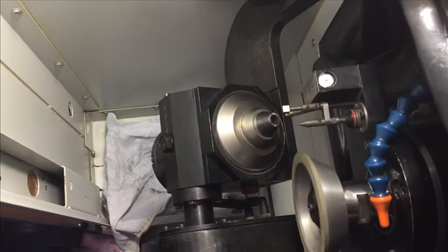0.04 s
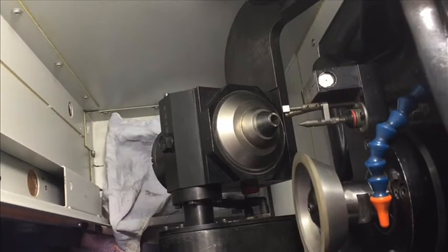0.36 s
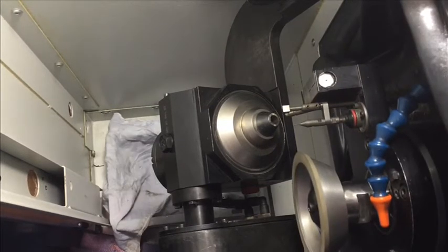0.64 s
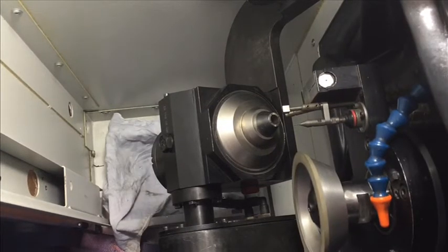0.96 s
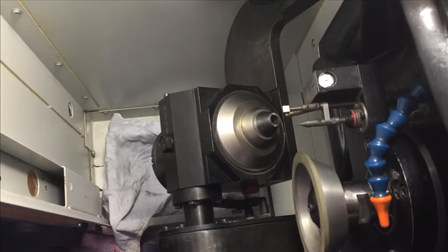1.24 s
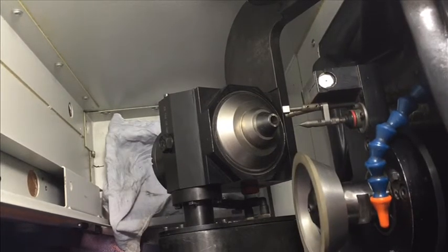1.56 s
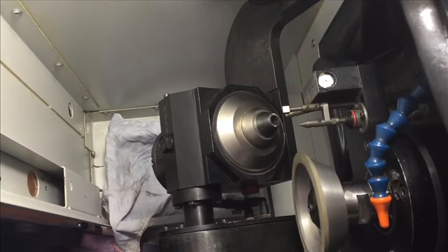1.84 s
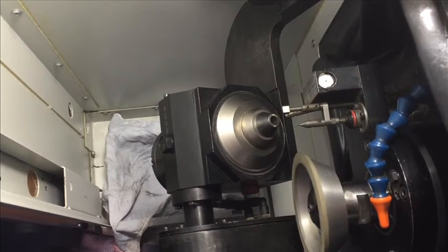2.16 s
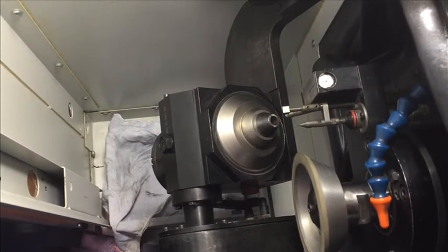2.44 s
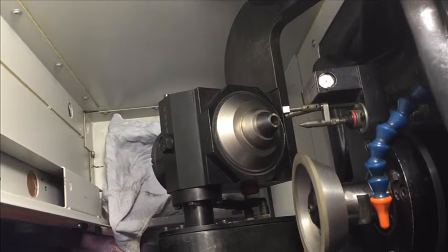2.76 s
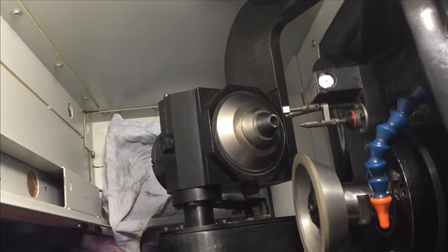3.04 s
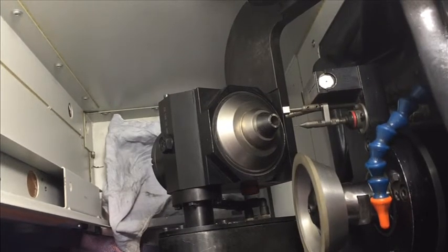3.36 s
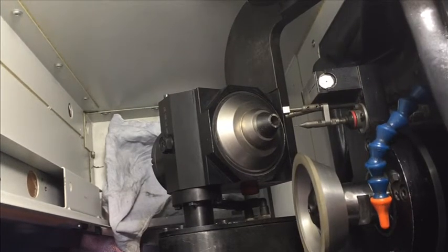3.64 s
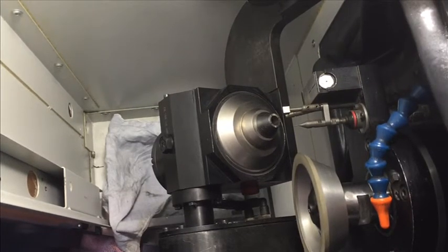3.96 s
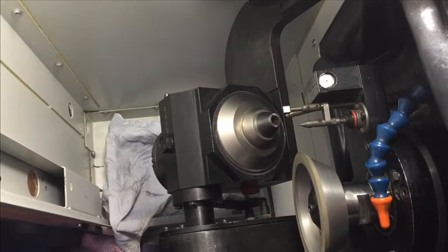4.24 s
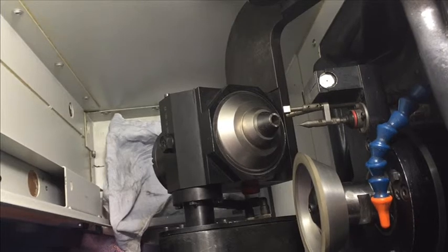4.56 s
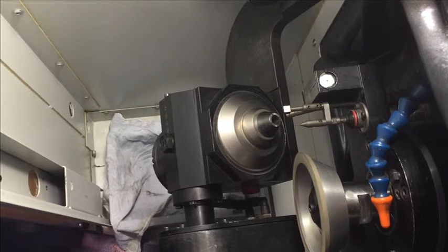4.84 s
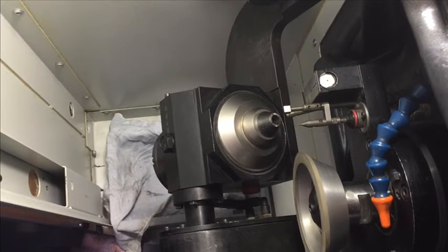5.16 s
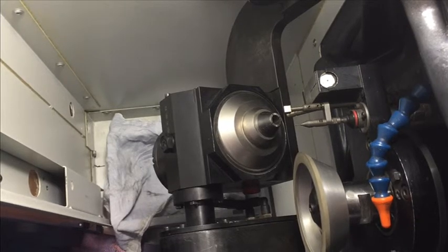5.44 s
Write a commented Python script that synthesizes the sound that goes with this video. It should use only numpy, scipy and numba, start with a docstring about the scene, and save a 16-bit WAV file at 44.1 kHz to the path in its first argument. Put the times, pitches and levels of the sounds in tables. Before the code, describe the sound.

A valve clacks and air hisses loudly in a grinding machine, stops briefly over a low hum, then blasts again.

```python
"""Compressed air in a tool grinder

Air blows inside the steel cabin of an idle grinder: two long blasts, with a valve clack at the start
and one between them. The hiss gets brighter and fuller as the jet sweeps over metal parts, and a few
bumps make the panels ring. Underneath, the machine hums and a motor drive whines; an automatic
volume control turns everything down while the air is on."""
import sys
import numpy as np
from scipy import signal
from scipy.fft import rfft, irfft, next_fast_len
from scipy.io import wavfile
from scipy.ndimage import uniform_filter1d, map_coordinates
from numba import njit

SR = 44100
rng = np.random.default_rng(int(sys.argv[2]) if len(sys.argv) > 2 else 0)


def int16_out(signal):
    """Quantize to a 16-bit WAV file."""
    q = np.round(np.clip(np.atleast_2d(signal).T, -1, 1) * 32767)
    wavfile.write(sys.argv[1], SR, q.astype(np.int16))


N = 246959
TOP_HZ = 15350  # upper limit of the treble


def amp(db):
    """Turn decibels into a number to multiply by."""
    return 10 ** (np.asarray(db) / 20)


def unit(x):
    """Scale a signal to an average (rms) level of 1."""
    return x / np.sqrt(np.mean(x ** 2) + 1e-20)


def along(points, hz):
    """Read a smooth path through (pitch, value) points at the pitches hz."""
    pitches, values = np.transpose(points)
    return np.interp(np.log(hz + 1), np.log(pitches + 1), values)


def wobble(rate):
    """A smooth curve through `rate` random values a second."""
    return map_coordinates(rng.standard_normal(int(N * rate / SR) + 4), [np.arange(N) * rate / SR])


def filtered(x, response):
    """Make each pitch in x louder or softer by the factor response(hz)."""
    size = next_fast_len(x.shape[-1] + SR // 4)
    return irfft(rfft(x, size) * response(np.fft.rfftfreq(size, 1 / SR)), size)[..., :x.shape[-1]]


def noise(response, length=N):
    """Noise of level 1, with its tone shaped by response(hz)."""
    return unit(filtered(rng.standard_normal(length), response))


def valve(open_s=0.013, empty_s=0.068):
    """Air flow from 0 to 1: the valve snaps open, and the hose empties after it shuts."""
    # When the valve is open: start_s, end_s
    blasts = [(-.05, 1.8216), (2.216, 5.233)]
    t = np.arange(N) / SR
    return sum(np.clip((t - start) / open_s, 0, 1) * amp(-60 * np.maximum(t - end, 0) / empty_s)
               for start, end in blasts)


def pressure_db(rise_s=0.009):
    """Extra hose pressure: it jumps up, settles, and stays a little high while stored air drains."""
    # Pressure surges: start_s, overshoot_db, settle_s, reserve_db, drain_s
    surges = [(.085, 8, 0.18, 2, 0.98), (2.205, 3.5, .09, 4.5, 0.34)]
    total = np.zeros(N)
    for start_s, overshoot_db, settle_s, reserve_db, drain_s in surges:
        age = np.maximum(np.arange(N) / SR - start_s, 0)
        overshoot = overshoot_db * np.cos(np.pi / 2 * np.minimum(age / settle_s, 1)) ** 2
        reserve = reserve_db * np.cos(np.pi / 2 * np.minimum(age / drain_s, 1))
        total += np.minimum(age / rise_s, 1) * (overshoot + reserve)
    return total


def sweep_db(edge_s=0.059, arch_share=0.18):
    """Splash and whistle rise as the jet meets a part, peak at its middle and drop at its far edge."""
    # Passes of the jet over a part: start_s, end_s, extra_splash_db, extra_whistle_db
    sweeps = [(-.05, 0.614, 2, 3), (0.668, 1.038, 4.5, 6.5), (1.196, 1.632, 1.7, 1),
              (1.672, 1.877, 4.5, 9.5), (2.308, 2.702, 4.6, 7.5), (2.81, 3.08, 1.3, 6),
              (3.136, 3.505, 4, 8.5), (3.62, 3.868, 2.2, 0), (3.945, 4.13, 5, 7), (4.195, 4.48, 2.5, -1),
              (4.554, 4.728, 5.2, 9), (4.853, 5.28, 2.5, 1)]
    t, splash, whistle = np.arange(N) / SR, np.zeros(N), np.zeros(N)
    for start, end, splash_db, whistle_db in sweeps:
        on_part = np.clip(np.minimum(t - start, end - t) / edge_s + .5, 0, 1)
        arch = np.sin(np.pi * np.clip((t - start) / (end - start), 0, 1))
        contact = on_part * (1 - arch_share + arch_share * arch)
        splash += splash_db * contact
        whistle += whistle_db * contact
    return splash, whistle


def jet_band(low_hz, high_hz):
    """One pitch range of the jet's noise, coloured by sound bouncing between the panels."""
    # The tone of the jet: pitch_hz, level_db
    jet = [(300, -24), (1050, -16.5), (1900, -9.5), (2450, -8.5), (3000, -17.5), (4300, -6.5), (5800, -9),
           (6600, -4.5), (8400, -2), (10500, -9), (11500, -3), (13200, -3.5), (15100, 0)]
    # Pitches that build up or cancel in the cabin: pitch_hz, width_hz, boost_db
    cabin = [(1060, 70, -4.6), (1450, 45, -4.5), (1510, 45, 3.3), (1630, 45, -3.5), (1690, 35, 3.5),
             (1810, 45, -3.2), (1920, 52, 5.8), (2030, 70, -4.2), (2205, 80, 7.3), (2320, 45, -4.5),
             (2770, 45, 6), (3220, 45, 7), (3450, 170, 6.4), (3590, 45, 4.5), (3900, 300, -3.4),
             (4870, 110, -7.6), (5215, 55, 5), (6000, 55, 4.5), (6260, 60, 3), (6665, 55, 3),
             (6830, 110, -2.9), (7120, 45, -5), (7560, 280, -4.6), (7850, 110, -4.5), (8820, 70, -6.4),
             (9950, 280, 2.4), (10190, 110, -4.7), (10980, 110, 4.6), (11565, 70, 5.7), (13810, 70, 3.5)]

    def response(hz):
        cabin_db = sum(db / (1 + (2 * (hz - centre) / width) ** 2) for centre, width, db in cabin)
        return amp(along(jet, hz) + cabin_db) * (hz > low_hz) * (hz < high_hz)
    return noise(response)


def walls(x, strength=0.069, count=10):
    """Nearby steel walls send back weak, quick echoes that colour the hiss."""
    delays_s = rng.uniform(.003, .02, count)
    echoes = sum(rng.choice([-1, 1]) * np.pad(x, (int(delay * SR), 0))[:N] for delay in delays_s)
    return (x + strength * echoes) / np.sqrt(1 + count * strength ** 2)


def draught(pressure, gust_db=14, gust_s=0.13):
    """Moving air rumbles on the microphone, most when the first blast stirs the still cabin."""
    # The tone of the draught: pitch_hz, level_db
    rumble = [(20, -23.5), (55, 0), (130, -5), (220, -2.5), (330, -8.5), (420, -15.5), (500, -6), (600, -8),
              (750, -22), (1500, -49.5)]
    gust = gust_db * np.exp(-np.arange(N) / SR / gust_s)
    level_db = -49 + 0.69 * pressure + gust + 2.5 * wobble(22) + 0.9 * wobble(7)
    return noise(lambda hz: amp(along(rumble, hz))) * amp(level_db)


def air_jet(hiss_db=-22, splash_db=-3, rush_db=-11, whistle_db=-20, flutter_db=0.53):
    """Tiny swirls of air sizzle at the nozzle; bigger ones splash on metal and rush round the cabin."""
    pressure = pressure_db()
    sweep, edge_db = sweep_db()
    sizzle = jet_band(10500, TOP_HZ) * amp(pressure + 0.46 * sweep)
    splash = jet_band(3000, 10500)
    rush = jet_band(300, 3000) * amp(rush_db + 1.09 * pressure + 0.48 * sweep + 0.5 * wobble(30))
    # a breathy whistle stands out when the jet hits a sharp edge head-on
    whistle = jet_band(4180, 4680) * amp(whistle_db + edge_db)
    on_metal = amp(splash_db + pressure + sweep) * (splash + whistle)
    hiss = amp(hiss_db + flutter_db * wobble(35)) * (sizzle + on_metal + rush)
    return valve() * (walls(hiss) + draught(pressure))


def idle_machine(fan_db=-52, waver_radians=0.15):
    """Cooling fans whoosh under the slightly unsteady tones of the motor and its drive."""
    # Motor hum and drive whine: pitch_hz, level_db
    hum = [(133.7, -54), (97, -56), (337, -65.5), (580, -70), (980, -65), (1308, -70.5), (1850, -80.5),
           (9990, -63.5), (14998, -88)]
    # The tone of the fans: pitch_hz, level_db
    fan = [(25, -21), (50, -7.5), (125, -6), (210, -6), (280, -14.5), (350, -10), (450, -17.5),
           (600, -13.5), (1100, -18.5), (1950, -19), (3000, -32.5), (7000, -41.5), (11000, -55)]
    t = np.arange(N) / SR
    tones = sum(amp(db) * np.sqrt(2) * np.sin(2 * np.pi * hz * t + waver_radians * wobble(12))
                for hz, db in hum)
    return tones + amp(fan_db) * noise(lambda hz: amp(along(fan, hz)))


def ring(tones, t, build_cycles):
    """Struck metal rings: each tone builds up, low ones last, and falls 60 dB in its fade_s."""
    out = np.zeros(len(t))
    for hz, db, fade_s in tones:
        fade = amp(db + rng.normal(0, 1) - 60 * t / fade_s)
        build = 1 - np.exp(-hz * t / build_cycles)
        out += fade * build * np.sin(2 * np.pi * (hz * t + rng.random()))
    return out / np.linalg.norm([amp(db) for _, db, _ in tones])


def valve_clacks(crack_hz=1700, crack_fade_s=0.075, tick_db=-23):
    """The valve's moving parts strike with a dry crack and a tick, then ring."""
    # Strikes of the valve: start_s, level_db
    strikes = [(.068, -15), (1.9316, -33.5)]
    # Ringing tones of its parts: pitch_hz, level_db, fade_s
    valve_tones = [(200, -6, 0.19), (375, -15.5, 0.52), (470, -3.5, .19), (560, -15, 0.42),
                   (760, -14.5, 0.37), (982, -5.5, 0.16), (1096, -2, 0.15), (1146, -6.5, 0.22),
                   (1372, -3, .14), (1587, -1.5, 0.13), (1687, -9.5, .14), (1804, -2.5, 0.063),
                   (2020, -11, 0.16), (2120, -5.5, .12), (5572, -9.5, .07), (5820, -11.5, 0.065)]
    out, t = np.zeros(N + SR), np.arange(SR // 2) / SR
    for start_s, db in strikes:
        crack = noise(lambda hz: 1 / (1 + ((hz - crack_hz) / 520) ** 4), len(t))
        tick = amp(tick_db) * rng.standard_normal(len(t))
        contact = (crack + tick) * amp(-60 * t / crack_fade_s)
        ringing = 1.4 * ring(valve_tones, t, build_cycles=2.6)
        out[round(start_s * SR):][:len(t)] += amp(db) * (contact + ringing)
    return out[:N]


def panel_bumps(thud_db=2, thud_rise_s=0.0044, thud_fade_s=0.091):
    """Each bump makes a short thud and rings the panel tones that lie near its own pitch."""
    # Bumps on the machine: start_s, level_db, centre_hz, spread_octaves
    bumps = [(.448, -19.5, 620, 1.2), (0.464, -28, 208, 0.99), (0.519, -30.5, 220, 1.2),
             (0.665, -28.5, 604, 1.5), (.748, -30, 232, 1.1), (.766, -29.5, 260, 1.5),
             (2.219, -30.5, 207, 1.1), (2.664, -31.5, 200, 1.6), (3.783, -34.5, 129, 0.72)]
    # Ringing tones of the steel panels: pitch_hz, level_db, fade_s
    panel_tones = [(153, 3.5, 0.086), (212, -3, 0.14), (292, -3.5, 0.087), (418, -10, 0.098),
                   (507, -6, 0.18), (755, -18, 0.072), (954, -1, 0.072)]
    out, t = np.zeros(N + SR), np.arange(SR // 2) / SR
    for start_s, db, centre_hz, spread in bumps:
        def reach_db(hz):
            return -30 * np.log10(1 + (np.log2((hz + 1) / centre_hz) / spread) ** 2)
        struck_tones = [(hz, level + reach_db(hz), fade_s) for hz, level, fade_s in panel_tones]
        ringing = ring(struck_tones, t, build_cycles=0.5)
        thud = noise(lambda hz: amp(reach_db(hz)) / (1 + (hz / 2600) ** 4), len(t))
        thud *= amp(thud_db - 60 * t / thud_fade_s) * (1 - np.exp(-t / thud_rise_s))
        out[round(start_s * SR):][:len(t)] += amp(db) * (ringing + thud)
    return out[:N]


def workshop_echo(x):
    """The room outside the cabin echoes, and the highest pitches die away first."""
    # Time for the echo to fall 60 dB: pitch_hz, fade_s
    fades = [(200, 0.54), (2000, 0.65), (6000, 0.41), (14000, 0.18)]
    hz, t, spectrum = signal.stft(rng.standard_normal(SR), SR, nperseg=256)
    tail = signal.istft(spectrum * amp(-60 * t / along(fades, hz)[:, None]), SR, nperseg=256)[1]
    return signal.fftconvolve(x, tail / np.linalg.norm(tail))[:N]


def scene():
    """Air, bumps, clacks and the idle machine, the same in both channels."""
    near = amp(10) * air_jet() + amp(9.5) * panel_bumps() + amp(6) * valve_clacks()
    mono = near + amp(-28.5) * workshop_echo(near) + idle_machine()
    return np.array([mono, mono])


@njit
def follow_level(level, rise, fall):
    """Track loudness, with one speed going up and another coming down."""
    out, held = np.zeros(len(level)), level[0]
    for i in range(len(level)):
        held += (level[i] - held) * (rise if level[i] > held else fall)
        out[i] = held
    return out


def record(dry, max_cut_db=10.5, half_cut_at_db=-35, rise_s=0.015, fall_s=0.043):
    """Automatic volume control turns loud sound down; peaks are rounded and the top treble is cut."""
    loudness = uniform_filter1d(np.abs(dry[0]), SR // 200)
    level = follow_level(loudness, 1 / (rise_s * SR), 1 / (fall_s * SR))
    turned_down = dry * amp(-max_cut_db * level / (level + amp(half_cut_at_db)))
    rounded = turned_down / (1 + np.abs(turned_down) ** 8) ** (1 / 8)
    return filtered(rounded, lambda hz: np.clip((TOP_HZ - hz) / 120, 0, 1))


dry = scene()
out = record(dry)
int16_out(out)
```